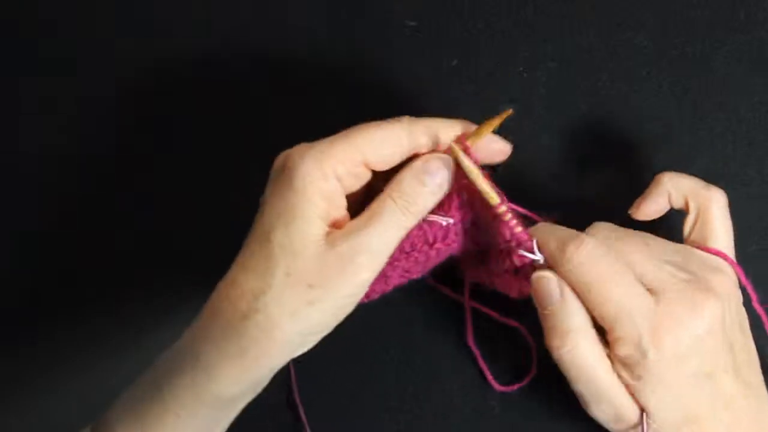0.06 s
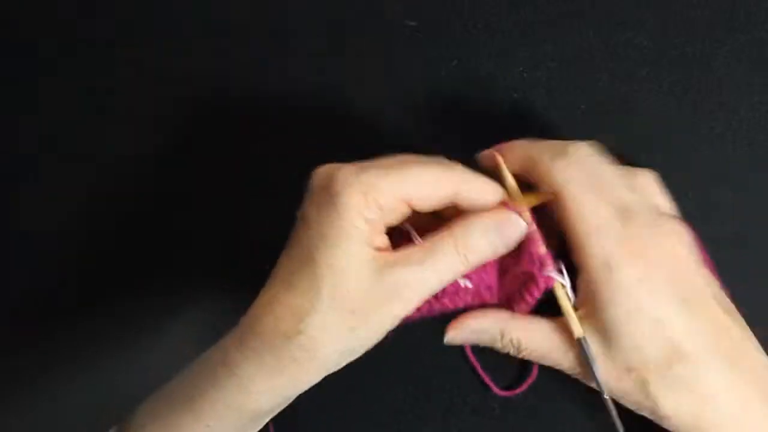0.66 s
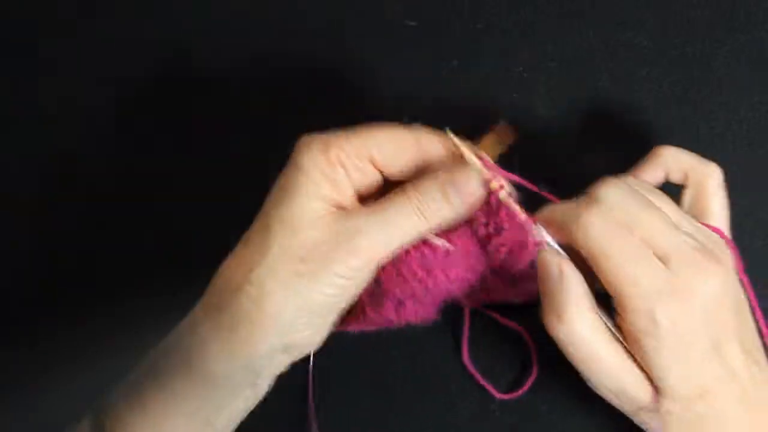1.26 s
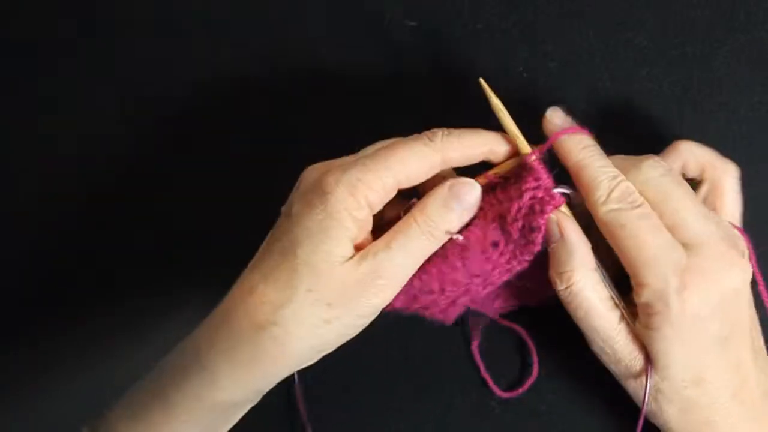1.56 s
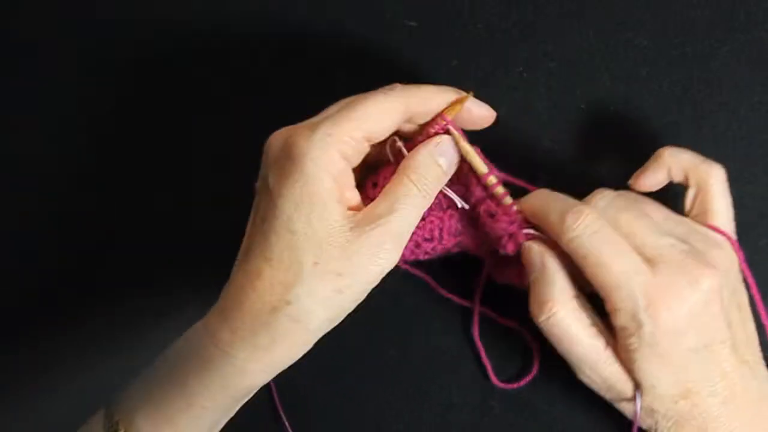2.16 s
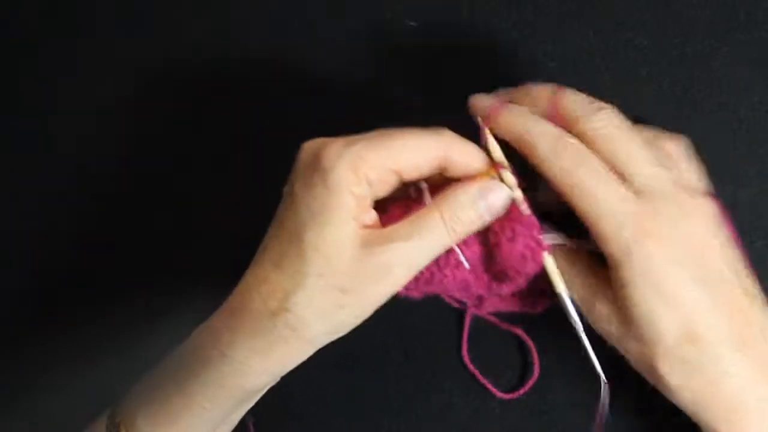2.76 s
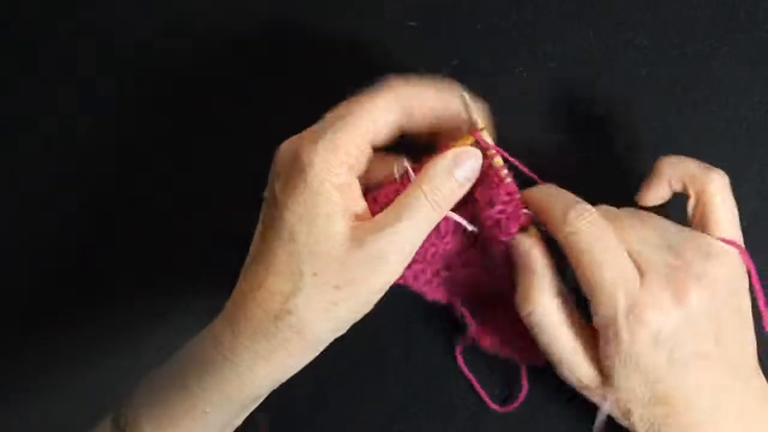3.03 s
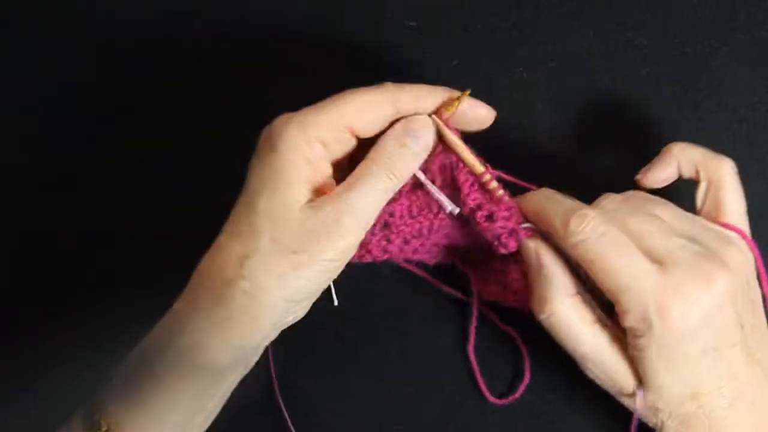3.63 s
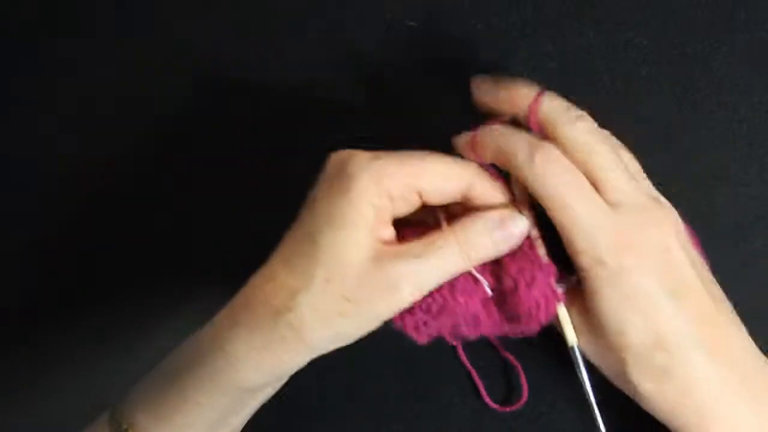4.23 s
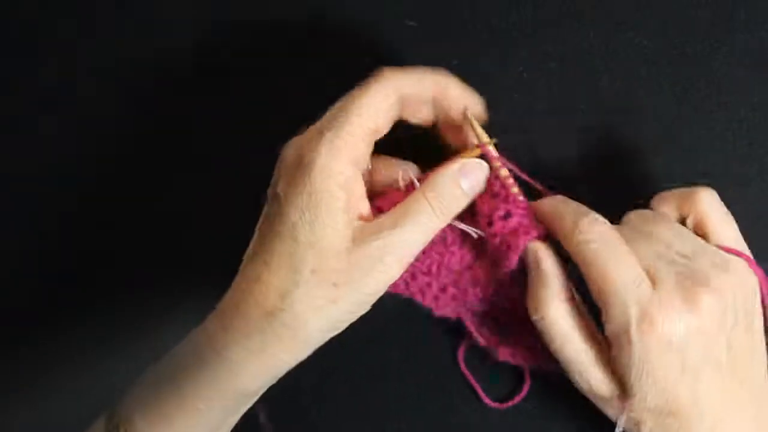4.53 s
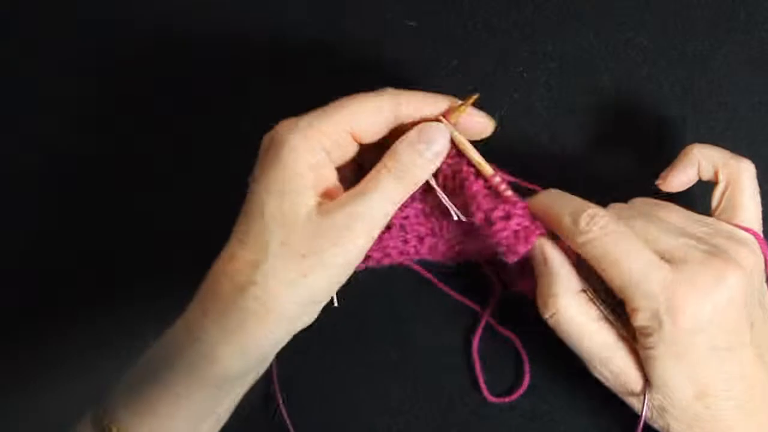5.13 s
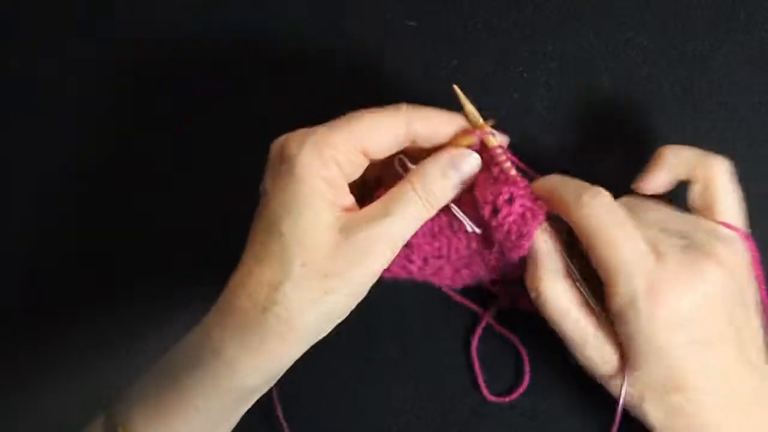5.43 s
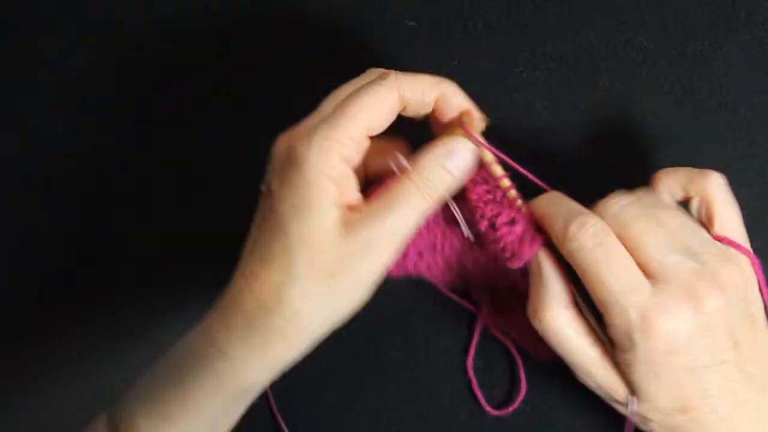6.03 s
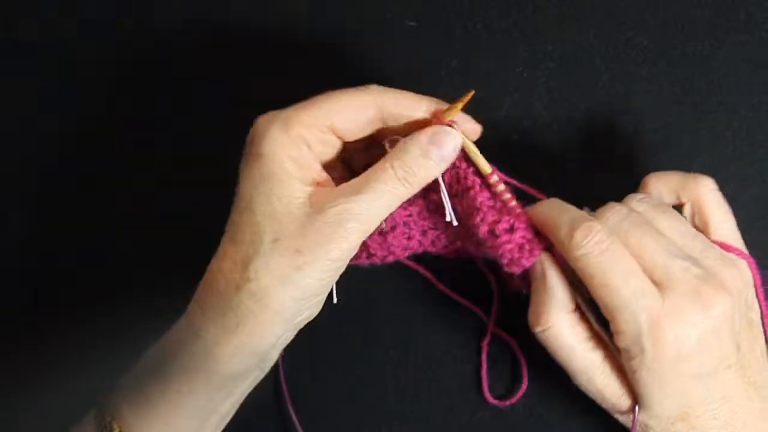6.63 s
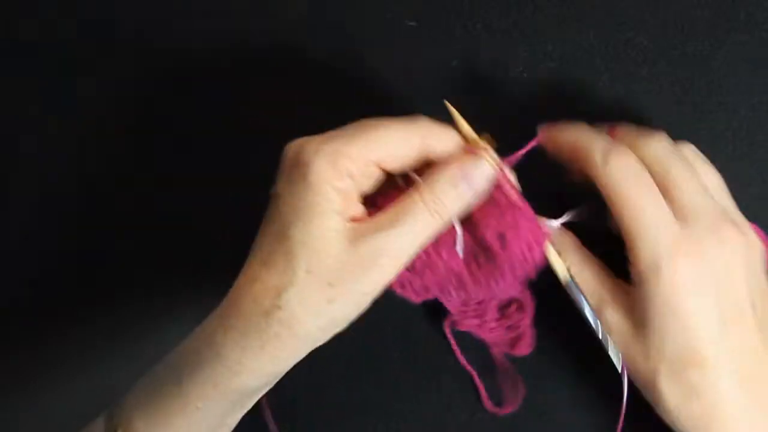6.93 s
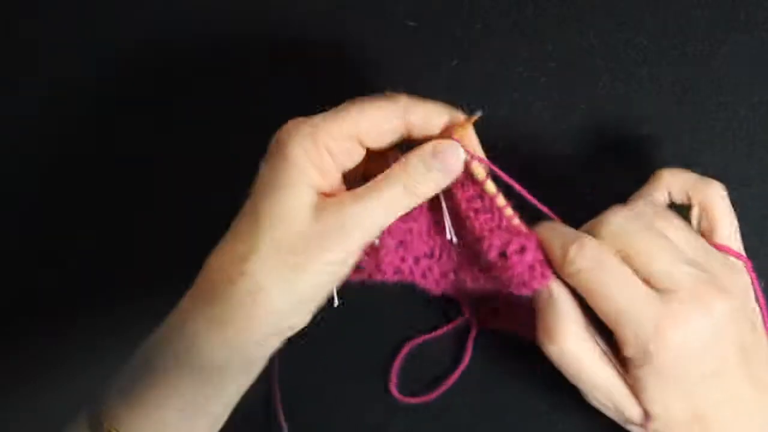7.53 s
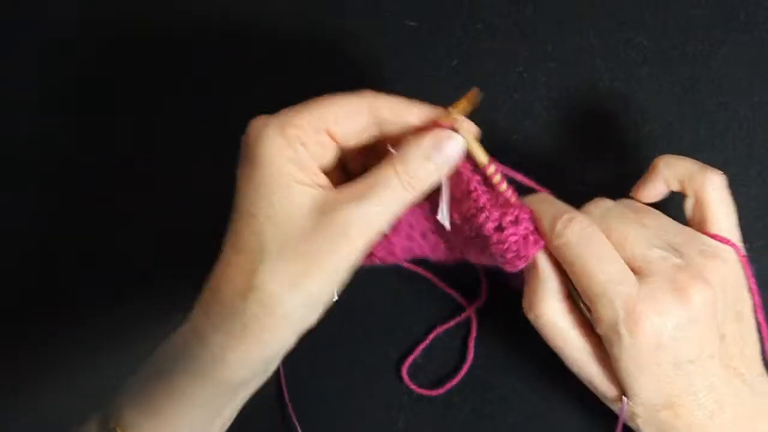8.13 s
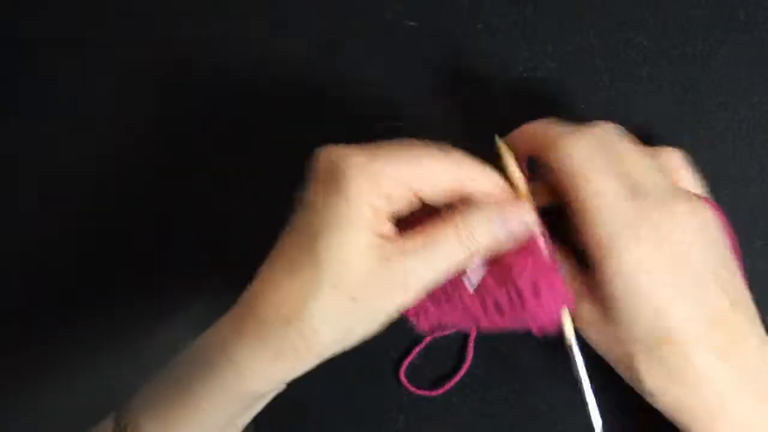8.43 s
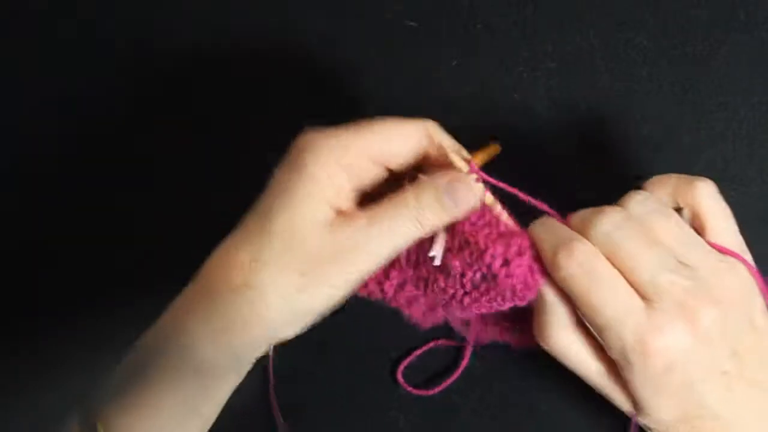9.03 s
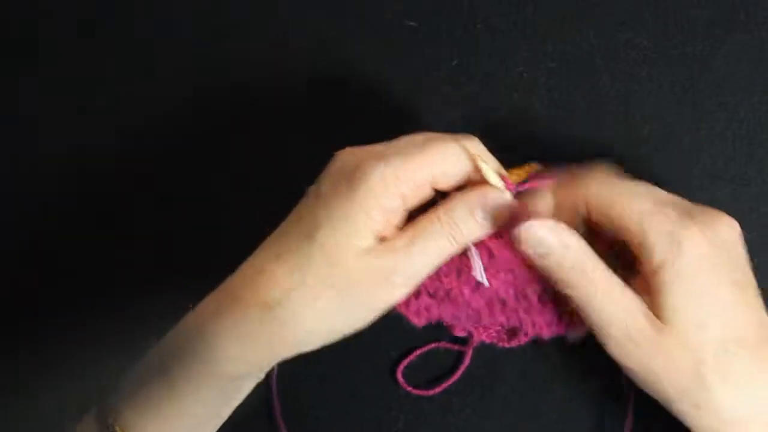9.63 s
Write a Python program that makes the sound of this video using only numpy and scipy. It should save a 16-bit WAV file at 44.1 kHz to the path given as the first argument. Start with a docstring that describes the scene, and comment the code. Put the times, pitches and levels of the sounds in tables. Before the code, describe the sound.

Faint, dry ticks and brief scrapes of wooden knitting needles come at uneven intervals, mixed with the fine rustle of yarn drawn through stitch after stitch. The hands work close to the microphones in a still room, over steady hiss, a slight hum and a deep rumble that swells when the table sways. One soft thud on the table rings briefly shortly before the end.

```python
"""In a quiet room, someone knits by hand at a table, close to the microphones.
Every stitch is the same round of moves: the needle enters, the hand regrips, the wool is wrapped,
tightened and drawn through. Each pull makes the fibres fizz and the fabric rub. The wooden tips click
and scrape along each other, and the arms set the table swaying and once bump it.
Under it all lie a low rumble, a faint electrical hum and microphone hiss."""
import sys
import numpy as np
from scipy import signal
from scipy.fft import rfft, irfft, next_fast_len
from scipy.io import wavfile
from scipy.ndimage import uniform_filter1d, map_coordinates

SR = 44100
rng = np.random.default_rng(int(sys.argv[2]) if len(sys.argv) > 2 else 0)


def to_wav(s):
    """Save 16-bit WAV."""
    ch = np.atleast_2d(s).T  # columns
    pcm = np.round(np.clip(ch, -1, 1) * 32767)  # PCM
    wavfile.write(sys.argv[1], SR, pcm.astype(np.int16))


N = 431298

# One stitch: push the loop up, enter it, open it, lift the wool, wrap, tighten, draw through, slip off.
# t/s from the tightening, length/s, level/dB, fabric rub offset/dB, share that skates on wood (0-1)
STITCH_MOVES = [(-0.872, 0.085, -59.5, -5.5, 0.34), (-0.717, 0.049, -51, -7, 0.52),
                (-0.562, 0.047, -57, -8, 0.16), (-0.234, 0.098, -63, -3, 0.2),
                (-0.163, 0.041, -58.5, -3.5, 0), (0, 0.039, -48.5, -8, 0.11), (0.172, 0.1, -51.5, -6, 0.18),
                (0.342, 0.092, -56.5, -8.5, 0.06)]
# each stitch's tightening: t/s, time stretch before, time stretch after, gain before/dB, gain from then/dB
STITCHES = [(.938, 1.04, 0.92, .5, -4.5), (2.939, 1, 1.08, -5.5, 0), (4.423, 0.88, 1.12, -1, -0.5),
            (5.854, 0.99, 1.08, 0, -1.5), (7.284, 1.008, 0.97, 0.5, 0.5), (8.679, 0.95, 0.84, 1, -1.5)]
# the hand lets go of the needle to reach for the wool: t/s, level/dB
REGRIPS = [(.47, -57), (2.465, -63), (4.022, -62.5), (5.445, -61.5), (6.86, -60.5), (8.282, -61)]
# the wool is tugged or catches: t/s, length/s, level/dB
TUGS = [(.697, 0.048, -58.5), (1.09, 0.073, -52.5), (1.524, 0.1, -52), (1.71, 0.054, -54),
        (2.125, 0.034, -52), (2.293, 0.053, -56.5), (2.62, 0.13, -59), (3.48, 0.049, -56),
        (3.715, .025, -53), (4.253, .028, -51), (6.66, 0.081, -55), (7.11, 0.033, -61), (7.85, 0.019, -55),
        (8.51, 0.045, -58.5), (9.254, 0.085, -54), (9.303, 0.072, -50.5), (9.57, 0.55, -60.5)]
# the hands hold still for a moment: t/s, length/s
PAUSES = [(1.37, 0.084), (1.63, 0.037), (3.8, 0.034), (4.148, 0.081), (4.854, 0.037), (6.743, 0.056),
          (7.21, .05), (8.97, 0.071), (9.13, 0.079)]
# needle tips touch (t60 is the time a sound takes to fade by 60 dB):
# t/s, level/dB, ring f/Hz, crack against ring/dB, contact t60/s, lead-in graze/dB, top of crack f/Hz
CLICKS = [(0.06, -55, 2860, -14, .018, -20, 5000), (.801, -54, 2210, 10, .02, -20, 9000),
          (1.13, -46.5, 3130, -24, .022, -10, 6000), (1.384, -57, 1870, -6, .02, -15, 9000),
          (1.686, -53, 2050, 4, 0.038, -22, 12000), (1.927, -49, 2600, 6, .012, -30, 14000),
          (2.026, -60, 2220, -12, .015, -20, 5000), (2.886, -55, 5400, -2, .012, -20, 12000),
          (3.573, -51.5, 2150, -2, 0.053, -5, 14000), (3.577, -47, 3730, -8, .028, -4, 9000),
          (3.703, -47.5, 4180, 8, 0.015, -14, 15000), (4.2483, -44.5, 4550, 1, .011, -16, 15000),
          (4.372, -54, 4400, 8, .018, -25, 7000), (4.908, -51, 3940, 2, 0.0066, -30, 5500),
          (5.0291, -47.5, 3380, -4, 0.027, -15, 14000), (5.031, -47, 2040, -14, .018, -24, 7000),
          (5.812, -52.5, 5040, -8, .012, -20, 8000), (6.06, -52, 2060, -9, 0.042, -20, 8000),
          (6.299, -57, 3000, 4, .008, -30, 4000), (6.3094, -53, 2020, 4, 0.0099, -20, 9000),
          (6.396, -59, 5700, -3, .01, -25, 9000), (6.421, -53, 2270, 1, 0.046, -10, 10000),
          (6.5715, -48, 4230, -23, .025, -16, 7000), (7.074, -52, 1060, 6, 0.022, -18, 14000),
          (7.216, -57, 1940, 10, .012, -25, 8000), (7.467, -50, 1520, -1, .025, -14, 6000),
          (7.553, -53, 4100, 2, .03, -20, 8000), (8.476, -52, 1000, 9, 0.027, -20, 12000),
          (8.79, -50.5, 3120, 2, .025, -18, 7000), (9.4126, -49.5, 3060, 7, .007, -19, 14000),
          (9.676, -58, 6000, 6, .012, -18.5, 14000)]
# how a wooden needle rings: multiple of its ring pitch, width as a share of that pitch, level/dB
NEEDLE_RINGS = [(1, 0.09, 17), (1.72, 0.061, -3)]
# one needle slides along the other: t/s, length/s, level/dB, start f/Hz, end f/Hz
SLIDES = [(0.197, .03, -61, 5470, 4530), (0.225, .025, -57, 3140, 2680), (2.168, 0.022, -54.5, 5000, 4100),
          (2.436, 0.027, -59, 4400, 3600), (3.13, .03, -63, 4900, 3900), (3.741, 0.034, -53, 4630, 4000),
          (4.615, .03, -54.5, 4950, 4000), (5.139, .03, -60, 6100, 5900), (5.175, 0.027, -50.5, 5200, 4220),
          (6.042, .03, -55, 5200, 4100), (6.586, 0.02, -49.5, 4550, 4100), (7.455, 0.035, -54, 5600, 4570),
          (7.984, 0.023, -49, 5170, 4700), (8.017, 0.025, -59, 4300, 3900)]
# a needle knocks against a finger: t/s, level/dB, f/Hz, t60/s
KNOCKS = [(.459, -50, 515, 0.062), (5.437, -52, 560, 0.037), (5.656, -49.5, 1060, .014),
          (7.426, -48, 760, 0.044), (7.493, -51, 510, .06), (8.28, -62, 800, .03),
          (9.678, -53.5, 1000, 0.023)]
# taut wool runs over a needle: t/s, length/s, level/dB
WHISPERS = [(.04, 0.023, -60), (0.382, .04, -61), (1.075, .03, -56.5), (1.234, .04, -62), (1.7, .03, -60),
            (3.33, .03, -65), (4.04, .017, -60), (5.695, .02, -57), (7.11, .03, -65), (7.65, .035, -68),
            (8.805, .028, -53), (9.06, .022, -61), (9.31, .04, -55)]
# the knitted piece shifts under the hands: t/s, level/dB
CLOTH_SHIFTS = [(.48, -61.5), (2.46, -56.5), (5.45, -58.5), (5.98, -62), (7.49, -54.5)]
# pushes that sway the table: t/s, level/dB
PUSHES = [(.524, -11), (2.478, -21.5), (3.659, -29.5), (4.035, -14.5), (5.096, -21), (5.483, -20),
          (5.979, -40), (6.828, -12.5), (7.5, -30.5), (8.331, -18.5)]
# the low notes of the bumped table: f/Hz, level/dB, t60/s
TABLE_RINGS = [(84, -30, 0.87), (159, -35.5, 0.47), (203.6, -40, 0.81), (261, -43, 0.32)]
# the tones of the electrical hum: f/Hz, level/dB
HUM_TONES = [(100, -50), (207, -77.5), (415, -67)]

# Tone colours, or how strong each pitch is next to the others: f/Hz, level/dB
FIZZ_COLOUR = [(1000, -15), (2500, -20), (4500, -5.5), (7000, -4.5), (8600, -1), (10800, -2.5), (12500, -1),
               (14000, -3), (15700, -11)]  # wool fibres snapping
SKATE_COLOUR = [(1000, -15), (2500, -9), (4300, 2), (5800, 4), (7100, -6), (8400, 6), (10800, -7),
                (12500, 0.5), (13800, -10), (15700, -31)]  # stitches skating on wood
RUB_COLOUR = [(150, 15.5), (450, 5.5), (900, 3), (1600, 3), (2100, 5.5), (3000, 2), (4200, 5), (5500, 5.5),
              (6700, 1), (14000, -65)]  # fabric on fingers
CRACK_COLOUR = [(300, -11), (1000, 9.5), (2500, -6), (5000, -1), (6200, -1.5), (8300, 2.5), (10500, 0),
                (12300, 5), (15700, -12)]  # wood striking wood
WHISPER_COLOUR = [(6000, -31), (8500, -10), (10500, -11), (12000, -2), (12700, -2), (13800, -8),
                  (15700, -25)]  # taut wool on wood
CLOTH_COLOUR = [(120, -24), (280, 6), (400, 1), (520, 3.5), (680, -15), (1000, -15), (2000, -18),
                (5000, -37)]  # knitting dragging on palms
THUD_COLOUR = [(50, -14), (150, 4), (280, -4), (500, -14), (1500, -47), (8000, -80)]  # the bumped table
AIR_COLOUR = [(20, -16), (60, 22.5), (120, 15.5), (143, 16), (165, 17), (190, 13), (250, 11.5), (420, 8),
              (700, 3), (1300, -1), (2200, -4), (3200, -6.5), (5000, -8.5), (7200, -12.5), (12500, -15.5),
              (15700, -47)]  # still air and microphone hiss
RUMBLE_COLOUR = [(5, -12), (12, 0), (23, 5), (32, -28.5), (41, -5), (52, -13.5), (66, -29.5), (84, -18.5),
                 (115, -29.5), (200, -64.5)]  # trembling microphones

# How alike left and right are: f/Hz, likeness (1 the same, 0 unrelated, -1 or below opposite)
YARN_ALIKE = [(400, 1), (4500, 0.98), (8000, 0.6), (14000, 0.17)]
AIR_ALIKE = [(50, 0.15), (130, 0.34), (300, 0.17), (1000, 0.1), (14000, 0.16)]
RUMBLE_ALIKE = [(20, 0.58), (40, -0.14), (60, -1.12), (90, 0.16)]

SWAY_S = 0.08  # how long the table sways after a push


def yarn(pause_db=-8.5, snags_per_s=160, snag_db=-6):
    """Each pull snaps tiny wool fibres, skates stitches along the needle and rubs fabric on fingers."""
    t, power = clock(), np.zeros((3, N))
    for s, length, db, rub_db, skating in pulls():
        near = slice(max(0, int((s - 2 * length) * SR)), int((s + 2 * length) * SR))
        share = np.clip(skating, 0, 1)
        pull = amp(db) * swell(t[near], s, length)
        power[:, near] += np.outer([1 - share, share, amp(rub_db) ** 2], pull ** 2)
    stillness = sum(swell(t, s, length) for s, length in PAUSES)
    fizz, skate, rub = np.sqrt(power) * amp(pause_db * stillness)
    snags = friction(N, rate=snags_per_s, spread_db=-1.0, smooth=0.12)  # single fibres catch and tick
    snaps = friction(N, rate=6600, spread_db=-2.5, smooth=1.0)
    fibres = stereo(snaps + amp(snag_db) * snags, FIZZ_COLOUR, YARN_ALIKE)
    stitches = stereo(friction(N, rate=3000, spread_db=3, smooth=0.97), SKATE_COLOUR, YARN_ALIKE)
    fabric = stereo(friction(N, rate=1200, spread_db=1.5, smooth=1.0), RUB_COLOUR, YARN_ALIKE)
    catching = amp(1.2 * wobble(90))
    rubbing = amp(-2.05) * (fizz * fibres + skate * stitches) + amp(1.3) * rub * fabric
    return catching * shifting_colour(rubbing, depth_db=1.8)


def pulls(regrip_s=0.068, regrip_rub_db=3, slips_per_s=9, slip_s=.022, slip_db=-62.5,
          tug_rub_db=-5.5, tug_skating=0.036):
    """List every pull of the wool: each stitch's moves at its own pace, regrips, tugs and random slips."""
    moves = []
    for s, before, after, before_db, after_db in STITCHES:
        for offset, length, db, rub_db, skating in STITCH_MOVES:
            stretch, gain_db = (before, before_db) if offset < 0 else (after, after_db)
            moves.append((s + offset * stretch, length, db + gain_db, rub_db, skating))
    regrips = [(s, regrip_s, db, regrip_rub_db, 0) for s, db in REGRIPS]
    slips = [((k + rng.random()) / slips_per_s, slip_s, slip_db + 2 * rng.standard_normal())
             for k in range(int(slips_per_s * N / SR))]
    tugs = [(s, length, db, tug_rub_db, tug_skating) for s, length, db in list(TUGS) + slips]
    return moves + regrips + tugs


def shifting_colour(x, depth_db):
    """The rustle's tone colour shifts at random, in small patches of pitch and time."""
    spectra = signal.stft(x, nperseg=512)[2]
    patches = uniform_filter1d(rng.standard_normal(spectra.shape[1:]), size=5, axis=0)  # blur in pitch
    patches = uniform_filter1d(patches, size=8, axis=1)  # blur in time
    return signal.istft(spectra * amp(depth_db * unit(patches)), nperseg=512)[1][:, :N]


def clicks(tail_db=-26, tail_t60=0.21, stereo_width=0.63, graze_t60=0.089, strike=0.27):
    """A tip grazes, strikes, chatters briefly and rings the needle; nearby surfaces add a short tail."""
    lead = SR // 50
    out, t = np.zeros((2, N + SR)), (np.arange(SR // 10) - lead) / SR
    before, after = np.maximum(-t, 0), np.maximum(t, 0)
    five_ms = np.sqrt(.005 * SR / len(t))  # sets the level as if all the energy fell within 5 ms
    for s, db, ring_hz, crack_db, t60, graze_db, top_hz in CLICKS:
        graze = amp(graze_db - 60 * before / graze_t60)
        blow = amp(-60 * after / t60) + amp(tail_db - 60 * after / tail_t60)
        noise = rng.standard_normal(len(t)) + stereo_width * rng.standard_normal((2, len(t)))
        chatter = np.where(t < 0, graze, blow) * noise
        chatter[:, lead] += strike * np.linalg.norm(chatter[0])  # one sharp spike as the tips meet
        crack = filtered(chatter, lambda f: amp(along(CRACK_COLOUR, f)) / np.sqrt(1 + (f / top_hz) ** 8))
        tap = unit(needle(chatter, ring_hz)) + amp(crack_db) * unit(crack)
        out[:, round(s * SR) - lead:][:, :len(t)] += amp(db + 2.5) * five_ms * unit(tap)
    return out[:, :N]


def needle(x, ring_hz):
    """A wooden needle rings when x shakes it, but only briefly, because the fingers damp it."""
    def resonance(f, hz, width):
        damping = 1j * f * width * hz
        return damping / (hz ** 2 - f ** 2 + damping)
    return filtered(x, lambda f: sum(amp(db) * resonance(f, multiple * ring_hz, width)
                                     for multiple, width, db in NEEDLE_RINGS))


def slides():
    """Wood scrapes on wood; the pitch falls as the free end of the needle grows longer."""
    out, t = np.zeros((2, N + SR)), np.arange(SR // 4) / SR
    middle = t[-1] / 2
    for s, length, db, start_hz, end_hz in SLIDES:
        travel = np.clip(.5 + (t - middle) / length / 2, 0, 1)
        shared, side = friction(len(t), rate=1200, spread_db=-0.5, smooth=1.0)
        slips = shared + 0.18 * np.array([side, -side])
        scrape = np.zeros_like(slips)
        for k, hz in enumerate(np.linspace(start_hz, end_hz, 3)):  # fade from one pitch to the next
            broad = needle(slips, hz)
            ring = unit(needle(broad, hz)) + amp(-7) * unit(broad)
            scrape += np.maximum(0, 1 - abs(2 * travel - k)) * unit(ring)
        start = max(0, round((s - middle) * SR))
        out[:, start:start + len(t)] += amp(db) * swell(t, middle, length) * scrape
    return out[:, :N]


def knocks(attack_s=.0005, puff_db=-8):
    """A needle bumps a finger through the wool: a short hollow tock with a puff of cloth."""
    out, t = np.zeros(N + SR), np.arange(SR // 10) / SR
    five_ms = np.sqrt(.005 * SR / len(t))
    for s, db, hz, t60 in KNOCKS:
        puff = unit(filtered(rng.standard_normal(len(t)), lambda f: amp(along(CLOTH_COLOUR, f))))
        tone = np.sqrt(2) * np.sin(2 * np.pi * hz * t)
        tock = (tone + amp(puff_db) * puff) * amp(-60 * t / t60) * (1 - np.exp(-t / attack_s))
        out[round(s * SR):][:len(t)] += amp(db) * five_ms * unit(tock)
    return out[:N]


def taut_wool():
    """Taut wool runs over the polished wood with a thin, silky whisper."""
    level = sum(amp(db) * swell(clock(), s, length) for s, length, db in WHISPERS)
    return level * stereo(friction(N, rate=990, spread_db=1, smooth=1.0), WHISPER_COLOUR, YARN_ALIKE)


def cloth(shift_s=0.097):
    """The bunched knitting drags softly against the palms."""
    level = sum(amp(db) * swell(clock(), s, shift_s) for s, db in CLOTH_SHIFTS)
    return level * stereo(friction(N, rate=400, spread_db=5.0, smooth=0.56), CLOTH_COLOUR, YARN_ALIKE)


def table_sway(sway_hz=41.26, flex_hz=61, flex_db=-10, flex_s=.045, flex_lead_s=0.023,
               rebound_s=.18, rebound_db=-13.5):
    """The pushed table flexes, sways and swings back, shaking the two microphones in opposite ways."""
    t, sway = clock(), np.zeros(N)
    rebounds = [(s + rebound_s, db + rebound_db) for s, db in PUSHES]
    for s, db in list(PUSHES) + rebounds:
        near = slice(max(0, int((s - 2 * SWAY_S) * SR)), int((s + 2 * SWAY_S) * SR))
        slow = np.sin(2 * np.pi * (sway_hz * (t[near] - s) + rng.random()))
        quick = np.sin(2 * np.pi * (flex_hz * (t[near] - s) + rng.random()))
        flex = amp(flex_db) * swell(t[near], s - flex_lead_s, flex_s) * quick
        sway[near] += np.sqrt(2) * amp(db) * (swell(t[near], s, SWAY_S) * slow + flex)
    return sway * np.array([[1.2], [-.7]])


def table_bump(at_s=9.076, attack_s=0.006, thud_db=-45, thud_t60=0.74):
    """An arm bumps the table: a dull thud, and the table's low notes ring on."""
    t = np.maximum(clock() - at_s, 0)
    ring = sum(amp(db - 60 * t / t60) * np.sin(2 * np.pi * hz * t + rng.normal(0, 1.0, (2, 1)))
               for hz, db, t60 in TABLE_RINGS)
    thud = amp(thud_db - 60 * t / thud_t60) * stereo(rng.standard_normal((2, N)), THUD_COLOUR, AIR_ALIKE)
    return (ring + thud) * (1 - np.exp(-t / attack_s))


def air(level_db=-50):
    """Still air and microphone hiss make a soft, steady noise."""
    return amp(level_db) * stereo(rng.standard_normal((2, N)), AIR_COLOUR, AIR_ALIKE)


def rumble(rest_db=-29.5, shaken_db=-32, settle_s=0.2):
    """The microphones tremble slowly; each push on the table shakes them more, then they settle."""
    t = clock()
    shaken = sum(np.where(t < s, swell(t, s, SWAY_S), np.exp(-abs(t - s) / settle_s)) for s, _ in PUSHES)
    level = amp(rest_db) + amp(shaken_db) * shaken
    trembling = stereo(rng.standard_normal((2, N)), RUMBLE_COLOUR, RUMBLE_ALIKE)
    return level * trembling * amp([[-1], [1]])  # a little louder on the right


def hum():
    """A faint electrical hum wavers a little in loudness and pitch."""
    t = clock()
    return sum(np.sqrt(2) * amp(db + 0.54 * wobble(4.4)) * np.sin(2 * np.pi * hz * t + 0.15 * wobble(3))
               for hz, db in HUM_TONES)


def friction(size, rate, spread_db, smooth):
    """Surfaces stick and slip: two rows of tiny uneven snaps, about rate a second, on a smooth hiss."""
    happens = rng.random(size) < rate / SR
    strength = amp(spread_db * np.clip(rng.standard_normal(size), -2, 2))
    snaps = unit(happens * strength * rng.standard_normal((2, size)))
    return unit(snaps + smooth * rng.standard_normal((2, size)))


def stereo(pair, colour, alike):
    """Give two unrelated noises a tone colour and blend them into a partly alike left and right."""
    def response(hz):
        angle = np.arccos(np.clip(along(alike, hz), -1, 1)) / 2
        return amp(along(colour, hz)) * [np.cos(angle), np.sin(angle)]
    mid, side = filtered(pair, response)
    return unit(np.array([mid + side, mid - side]))


def filtered(x, response):
    """Scale and delay each frequency in x as response(hz) says."""
    size = x.shape[-1]
    padded = next_fast_len(size + 4096)
    return irfft(rfft(x, padded) * response(np.fft.rfftfreq(padded, 1 / SR)), padded)[..., :size]


def swell(t, centre, length):
    """A bell-shaped rise and fall, at half power length / 2 from its centre."""
    return np.exp2(-2 * np.minimum(((t - centre) / length) ** 2, 20))


def wobble(rate):
    """A smooth curve through rate random points a second."""
    return map_coordinates(rng.standard_normal(int(N * rate / SR) + 4), [clock() * rate])


def along(points, hz):
    """Read between the rows of an (f/Hz, value) table, on a log frequency scale."""
    freqs, values = np.transpose(points)
    return np.interp(np.log(hz + 1), np.log(freqs + 1), values)


def amp(db):
    """Turn decibels into a gain."""
    return 10 ** (np.asarray(db) / 20)


def unit(x):
    """Scale x to an average power of 1."""
    return x / np.sqrt(np.mean(x ** 2) + 1e-20)


def clock():
    """The time of every sample, in seconds."""
    return np.arange(N) / SR


def scene(lag_samples=1.0, pan_db=1.5):
    """The hands work just off centre, louder on the left and a moment sooner on the right."""
    hands = yarn() + taut_wool() + cloth() + clicks() + knocks() + slides()
    sides = np.array([[1], [-1]])
    delay_s = sides * lag_samples / 2 / SR
    hands = filtered(hands, lambda hz: amp(sides * pan_db) * np.exp(-2j * np.pi * hz * delay_s))
    return hands + table_sway() + table_bump() + air() + rumble() + hum()


def record(dry, top_hz=15760):
    """Cut away the very highest treble."""
    return filtered(dry, lambda hz: hz < top_hz)


dry = scene()
out = record(dry)
to_wav(out)
```